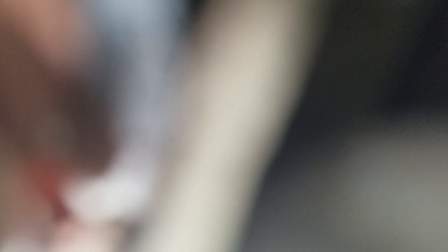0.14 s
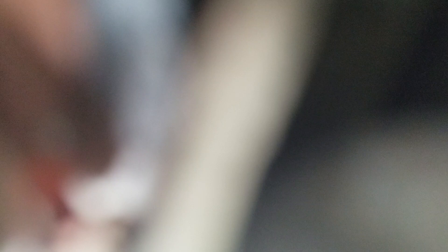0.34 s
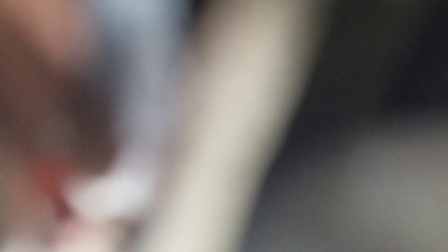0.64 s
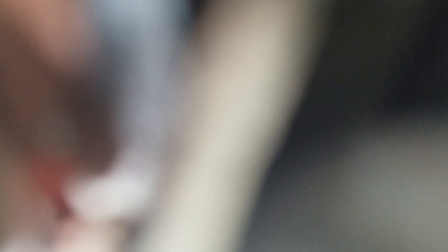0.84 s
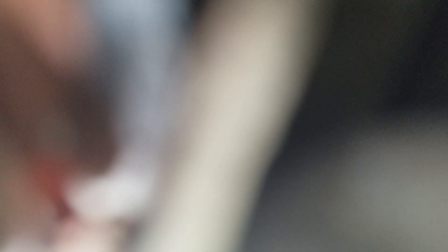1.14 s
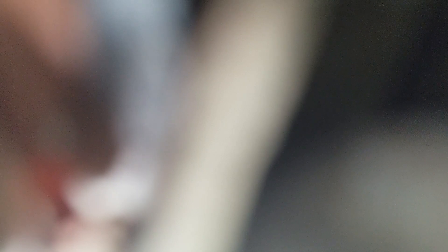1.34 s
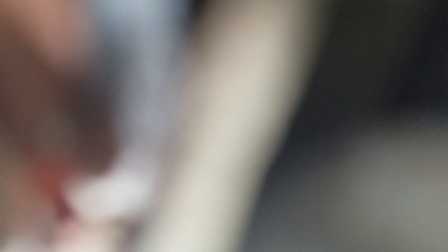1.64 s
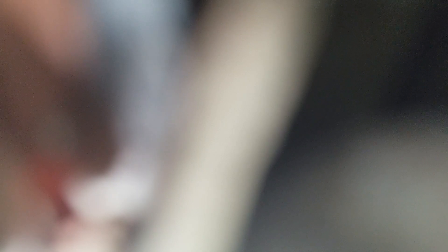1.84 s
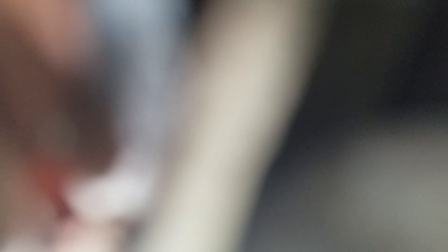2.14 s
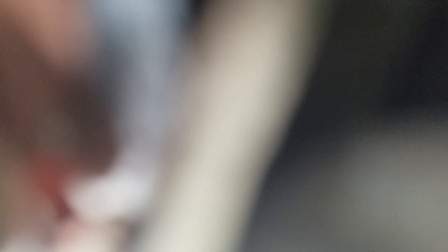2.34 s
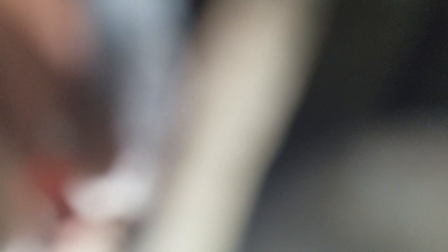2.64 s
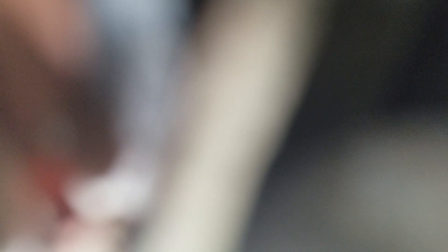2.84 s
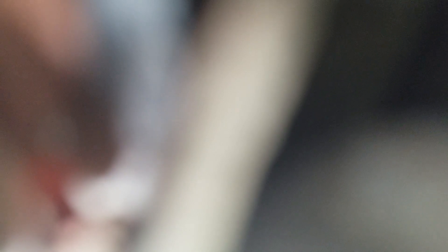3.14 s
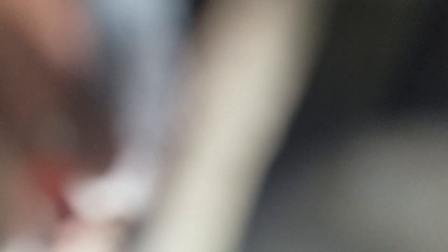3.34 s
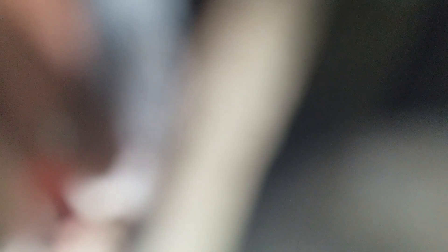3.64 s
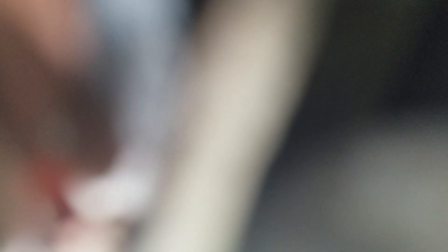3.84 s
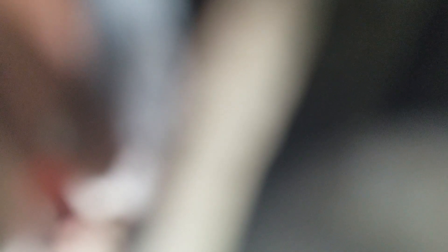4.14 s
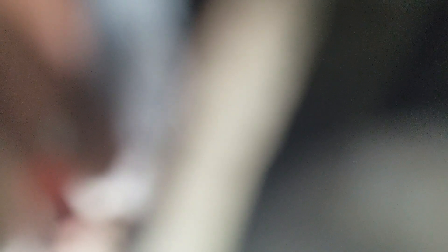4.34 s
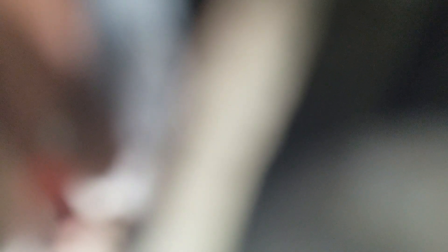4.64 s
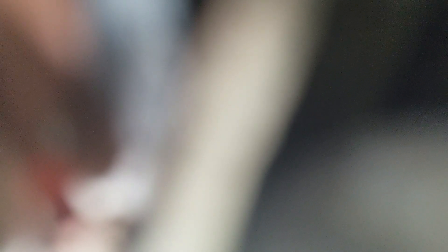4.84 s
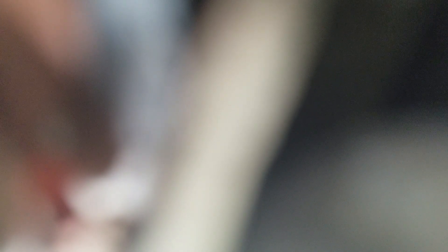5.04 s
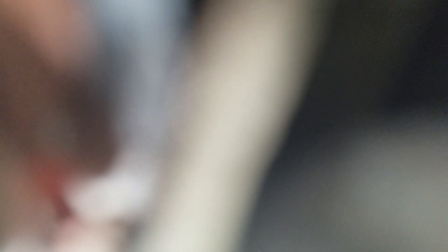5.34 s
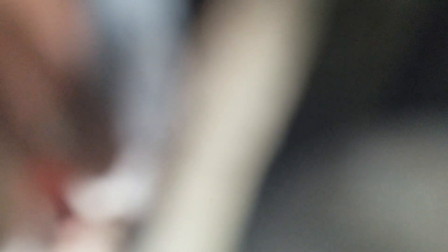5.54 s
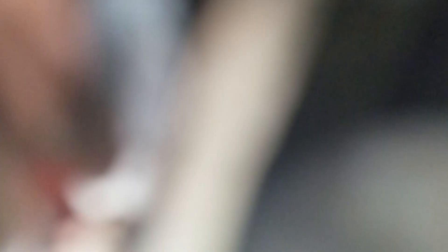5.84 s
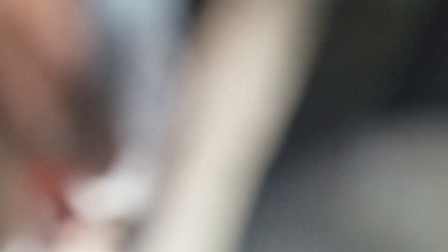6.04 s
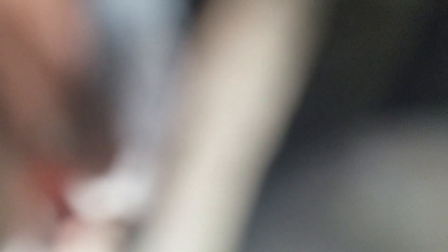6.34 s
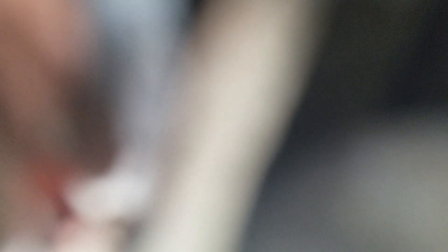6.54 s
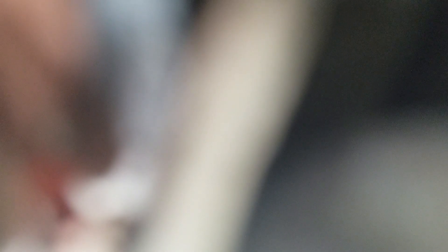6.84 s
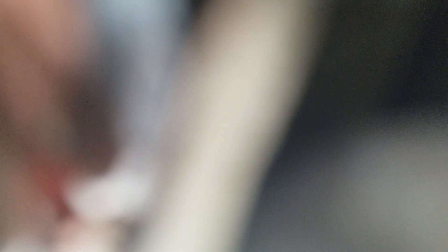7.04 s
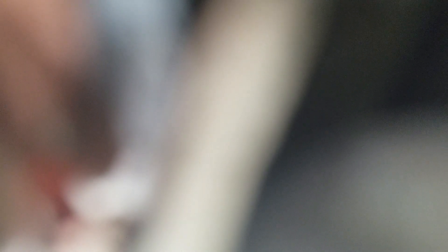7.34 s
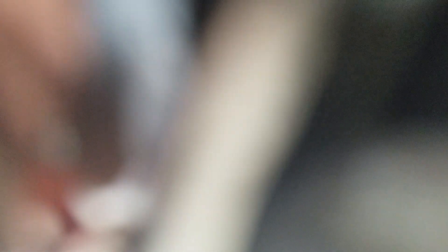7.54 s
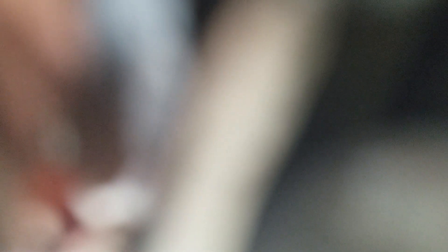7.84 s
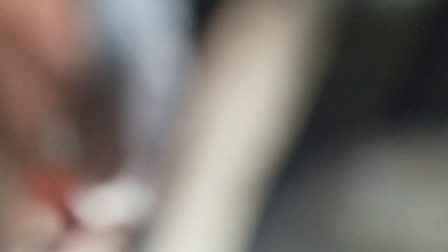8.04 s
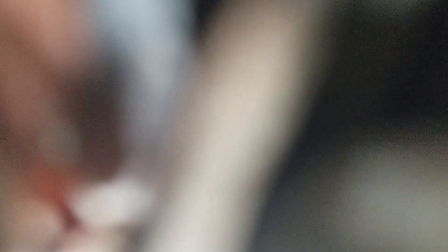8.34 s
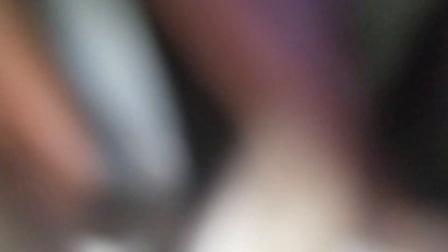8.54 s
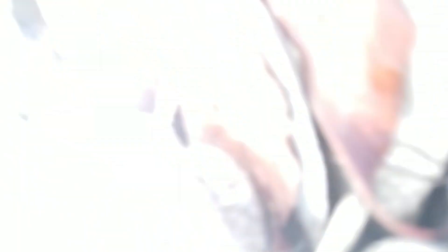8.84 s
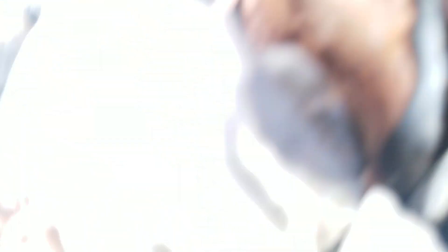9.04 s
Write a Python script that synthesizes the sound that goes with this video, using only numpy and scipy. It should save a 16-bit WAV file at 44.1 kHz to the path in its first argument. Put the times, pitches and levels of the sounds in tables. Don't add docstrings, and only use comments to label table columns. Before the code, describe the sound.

Very close stereo pickup, held in the hand, with low hum and thin hiss underneath. Small drips and crackles come first over soft finger rubbing, then quiet. A loud hollow gulp rings in a plastic bottle, followed by irregular wet plops of soap on water, skin scrapes and nail ticks. Near the end, bright knocks cluster with deep plops and a fine wash of water.

```python
import sys
import numpy as np
from scipy import signal
from scipy.fft import rfft, irfft, next_fast_len
from scipy.io import wavfile
from scipy.ndimage import uniform_filter1d

SR = 44100
rng = np.random.default_rng(int(sys.argv[2]) if len(sys.argv) > 2 else 0)


def boost_factor(decibels):
    exponent = np.asarray(decibels, float) / 20
    return 10 ** exponent


def inscribe(sig):
    pcm = np.round(np.clip(np.atleast_2d(sig).T, -1, 1) * 32767)
    wavfile.write(sys.argv[1], SR, pcm.astype(np.int16))


N = 405719

# (time [s], left lead [ms], left over right [dB])
BOTTLE_PLACE = [
    (0, 0.058, 3),
    (2.702, 0.36, 4),
    (3.6, 0.1, 4),
    (6.5, -0.15, 0.5),
    (6.62, -0.63, -5),
    (7.25, -0.23, 1),
    (7.349, 0.44, -4.5),
    (8.4, -0.13, 10),
    (8.44, -0.27, 21),
]
# (time [s], left over right [dB])
HAND_PLACE = [(0, 14.5), (.5, 11.5), (.6, 7), (2.5, 13), (2.91, 9), (3, -2), (3.26, -5), (3.4, 3), (5.5, 6),
              (5.9, -1.5), (7.6, -1), (7.72, 13), (8.3, 3), (8.36, 33), (8.55, 13.5), (8.72, 7),
              (8.88, 18.5), (9.1, 6.5)]
PORT_GAP = 20


def evened(x):
    return x / np.sqrt(np.mean(x ** 2) + 1e-20)


def wander(length, size):
    noise = rng.standard_normal(length)
    return evened(uniform_filter1d(uniform_filter1d(noise, size=size), size=size))


def read(points, hz):
    f, value = np.transpose(points)
    return np.interp(np.log(hz + 1), np.log(f + 1), value)


def add(mix, s, sound):
    part = mix[:, max(round(s * SR), 0):][:, :sound.shape[1]]
    part += sound[:, :part.shape[1]]


def sides(pan_db):
    pair = boost_factor(np.array([pan_db / 2, -pan_db / 2]))
    return pair / np.sqrt((pair ** 2).mean(0))


def glugs():
    out = np.zeros((2, N))
    when, leads, pans = np.transpose(BOTTLE_PLACE)
    tones = rings()
    snaps = uniform_filter1d(rng.standard_normal((len(tones), 2, 800)), size=5)
    shake = 0.039 * wander(N + SR, 300)
    flutter_db = 2.2 * wander(N + SR, 150)
    for (s, db, hz, t60, rise), snap in zip(tones, snaps):
        lead_ms, pan_db = np.interp(s, when, leads), np.interp(s, when, pans)
        delay = np.array([[-lead_ms], [lead_ms]]) / 2000
        t = np.maximum(np.arange(int(t60 * SR) + 800) / SR - delay - .0005, 0)
        drift = np.cumsum(shake[int(s * SR + hz):][:t.shape[1]]) / SR
        phase = 2 * np.pi * hz * (t + rise * t * t / 2 + drift)
        tone = np.sin(phase) + 0.046 * np.sin(2 * phase)
        tone = tone * boost_factor(-60 * (t / max(t60, .01)) ** 1.25)
        tone = tone * boost_factor(flutter_db[int(s * SR + 2 * hz):][:t.shape[1]])
        tone[:, :800] += 0.27 * snap * np.exp(-t[:, :800] / 0.0018)
        onset = 1 - np.exp(-t / 0.00053)
        add(out, s - .0005, boost_factor(db) * onset * tone * sides(pan_db)[:, None])
    out = signal.sosfilt(signal.butter(2, 110, 'high', fs=SR, output='sos'), out)
    t = np.arange(6000) / SR
    wall = rng.standard_normal((2, 6000)) * boost_factor(-60 * t / 0.13)
    blur = signal.oaconvolve(out, wall / np.linalg.norm(wall[0]), axes=1)[:, :N]
    return out + boost_factor(-12.5) * blur


def rings():
    # (time [s], peak level [dB], pitch [Hz])
    bubbles = [(0.585, -24.5, 1495), (0.63, -32, 1570), (0.728, -34.5, 1340), (1.682, -38, 1380),
               (1.717, -38, 1280), (1.794, -34.5, 1550), (2.632, -38, 600), (2.634, -2.5, 423),
               (2.653, -8.5, 319), (2.836, -11, 426), (3.599, -44.5, 524), (4.611, -27, 1180),
               (4.95, -28.5, 1000), (5.662, -27, 1950), (6.03, -40, 630), (6.447, -15.5, 422),
               (6.634, -22.5, 420), ]
    # (time [s], peak level [dB], pitch [Hz])
    plops = [(3.21, -27.5, 257), (4.261, -27.5, 344), (4.446, -18, 292), (5.103, -16, 614),
             (5.345, -15.5, 520), (6.257, -29, 167), (6.457, -7, 210), (6.795, -12.5, 382),
             (6.876, -12.5, 580), (7.013, -18.5, 430), (7.189, -19.5, 1410), (7.184, -18, 586),
             (7.359, -18.5, 590), (7.487, -12, 240), (7.506, -21, 195), (7.541, -14.5, 216),
             (7.757, -17.5, 1280), (8.512, -16.5, 330), (8.617, -20.5, 1340), (8.798, -15.5, 895),
             (8.881, -7.5, 1070), (8.878, -5.5, 400), (8.908, -7, 378), (9.19, -17.5, 454)]
    # (time [s], peak level [dB], pitch [Hz])
    sips = [(1.309, -54, 890), (1.308, -44, 1254), (4.278, -40.5, 470), (4.279, -44, 716), (4.39, -46, 644),
            (4.455, -21, 567), (4.558, -47, 610), (4.833, -38, 694), (5.965, -41, 625), (6.226, -44.5, 883),
            (7.208, -35, 580), (7.717, -43, 253), (8.731, -29, 616), (8.767, -30.5, 364)]
    # (time [s], peak level [dB], pitch [Hz], time to fall 60 dB [s])
    belly = [(2.331, -35, 297, 0.19), (2.642, -13, 289, 0.14), (2.838, -15, 288, 0.083),
             (2.848, -14, 307, 0.056), (2.871, -20.5, 306, 0.083), (2.906, -20, 340, 0.037),
             (2.93, -30, 287, 0.19), (4.598, -19.5, 286.7, 0.18), (4.662, -36, 310, 0.11),
             (4.699, -32, 233, 0.14), (4.977, -20, 267, 0.062), (5.107, -20.5, 267, 0.11),
             (5.45, -19, 256.5, 0.12), (5.527, -21.5, 338, 0.077), (5.54, -25, 274, 0.092),
             (5.55, -21.5, 201, 0.11), (5.786, -38, 244, 0.098), (7.392, -30.5, 228, 0.062),
             (7.889, -35, 254, 0.08), (8.061, -34.5, 262, 0.087), (8.225, -34, 264, 0.099),
             (8.387, -30.5, 264, 0.15), (8.793, -28, 215, 0.17), (8.926, -15.5, 162, 0.027),
             (9.003, -24.5, 145, 0.026)]
    # (time [s], peak level [dB], pitch [Hz], time to fall 60 dB [s])
    neck = [(.011, -33.5, 394, 0.078), (0.504, -20, 510, 0.089), (0.665, -33.5, 559, 0.07),
            (0.667, -34, 717, 0.064), (0.788, -34, 534, 0.057), (0.915, -34, 505, 0.073),
            (2.605, -14.5, 485, 0.09), (2.634, -12, 361, 0.18), (2.636, -8.5, 1024, 0.077),
            (2.659, -6.5, 480, 0.095), (2.634, -11, 448, 0.13), (2.647, -10, 474.8, 0.14),
            (4.05, -33.5, 470, 0.13), (4.705, -25.5, 334, 0.062), (4.713, -24, 413, 0.083),
            (4.833, -39, 400, 0.11), (4.888, -20.5, 813, 0.1), (5.075, -37.5, 444, 0.19),
            (5.103, -19.5, 400, 0.088), (5.17, -28.5, 394, 0.092), (5.36, -36, 515.3, 0.47),
            (5.843, -34.5, 540, 0.12), (5.965, -41.5, 407, 0.21), (5.986, -38.5, 525, 0.18),
            (6.227, -41.5, 550, 0.14), (6.392, -26, 444, 0.17), (6.452, -17, 367, 0.12),
            (6.894, -27.5, 461, 0.084), (7.039, -31.5, 448, 0.18), (8.45, -22, 488, 0.084)]
    # (time [s], peak level [dB], pitch [Hz], time to fall 60 dB [s], pitch rise [share per s])
    chirps = [(.52, -38, 1290, 0.023, 18), (6.04, -47, 780, 0.17, 10.5), (.561, -36, 1670, 0.017, 1),
              (.582, -18, 1167, 0.026, 42), (.611, -35.5, 1830, 0.038, 8), (.621, -35, 2440, .015, 14),
              (.659, -35.5, 260, .07, 0.5), (6.65, -30, 630, 0.037, 1), (6.544, -29.5, 435, 0.05, 7),
              (0.804, -37, 1550, 0.01, 3), (3.04, -34.5, 116, 0.28, -5.5), (.917, -47, 1670, .02, 3),
              (.011, -30.5, 636, 0.027, 15), (2.766, -35.5, 520, 0.11, -3), (2.848, -35.5, 96.4, 0.59, 0),
              (2.914, -32, 674, 0.027, -5), (4.873, -22, 568, 0.076, 31), (4.888, -33, 897, 0.13, 4.5),
              (4.965, -34, 945, 0.046, -34), (4.988, -44, 843, .1, 2.5), (5.208, -33, 468, 0.062, 7),
              (5.348, -28, 1140, 0.021, 34), (5.408, -28, 633, 0.037, 2), (5.545, -36, 520, 0.05, 18),
              (5.56, -32.5, 454, .1, 0), (5.99, -34.5, 449, 0.11, 12.5), (6.393, -46, 1430, .03, 12),
              (6.96, -29.5, 468, 0.023, 6), (7.108, -29.5, 520, .05, 5)]
    tones = list(chirps)
    for rows, cycles, rise_per_s in [(bubbles, 20.5, 19), (plops, 2.8, 13), (sips, 42.6, 0.35)]:
        tones += [(s, db, hz, cycles / hz, rise_per_s) for s, db, hz in rows]
    tones += [(*row, 0.97) for row in belly]
    tones += [(*row, 0.98) for row in neck]
    return tones


def rough_bursts():
    # (time [s], hold [s], level [dB], top frequency [Hz])
    surges = [(2.585, 0.015, -32.5, 2230), (2.599, 0.014, -20, 2200), (2.629, 0.026, -17.5, 1670),
              (2.763, .01, -48.5, 2290), (2.829, 0.0042, -33, 2700), (2.89, 0.0064, -42, 2510),
              (7.488, 0.05, -22, 3490), (4.599, 0.0076, -36.5, 2640), (5.102, 0.0084, -43, 1870),
              (6.385, 0.0097, -42, 2600), (6.445, 0.013, -28, 1280), (6.537, 0.01, -51, 2980),
              (8.442, 0.029, -25.5, 1500), (8.366, 0.009, -29.5, 2160)]
    low_hz, fall_db_per_s = 520, 551
    out, t = np.zeros((2, N)), np.arange(6000) / SR
    when, _, pans = np.transpose(BOTTLE_PLACE)
    noises = rng.standard_normal((len(surges), 4, 6000))
    for (s, hold, db, top_hz), (a, b, c, lumps) in zip(surges, noises):
        lumps = boost_factor(4.7 * evened(uniform_filter1d(lumps, size=120)))
        band = signal.butter(2, [low_hz, top_hz], 'band', fs=SR, output='sos')
        body = evened(signal.sosfilt(band, np.array([a + 1.3 * c, b - 1.1 * c]) * lumps))
        shape = np.minimum(t / 0.0043, 1) * boost_factor(db - fall_db_per_s * np.maximum(t - hold, 0))
        add(out, s, body * shape * sides(np.interp(s, when, pans))[:, None])
    return out


def ticks():
    # (time [s], peak level [dB], ring
    # [Hz])
    light_ticks = [(0.067, -45.5, 4150), (0.237, -29, 3120), (0.3683, -38, 3880), (0.406, -38.5, 3120),
                   (0.504, -36, 3000), (0.5354, -33, 5300), (0.5874, -47, 1900), (0.668, -44, 3820),
                   (0.896, -44.5, 3200), (1.481, -46, 5200), (1.5041, -39, 5340), (1.554, -28.5, 4860),
                   (1.579, -49, 4070), (1.6316, -33, 3120), (1.66, -45, 6750), (1.716, -45.5, 2850),
                   (1.7884, -53, 7500), (1.839, -47.5, 3140), (2.274, -45.5, 3850), (5.898, -40, 2070),
                   (8.542, -26, 4530), (8.637, -20.5, 6840), (8.88, -19.5, 2740), (8.91, -24, 2920),
                   (9.191, -35, 1860)]
    # (time [s], peak level [dB], ring [Hz])
    nails = [(2.4981, -33, 3640), (2.5852, -32, 2320), (2.6054, -20, 2110), (2.8334, -32, 2370),
             (3.2154, -22.5, 3530), (3.2603, -36, 2210), (3.951, -30.5, 3620), (4.601, -25.5, 2980),
             (5.244, -41, 11000), (5.291, -26, 1960), (5.3467, -19, 11200), (5.41, -25, 10000),
             (5.45, -26.5, 2740), (6.2264, -40.5, 3980), (6.38, -28.5, 3740), (6.64, -18.5, 3260),
             (6.799, -14.5, 4740), (6.804, -20, 2760), (7.1838, -26.5, 3520), (7.491, -32, 2950),
             (7.497, -18, 1500), (7.519, -23, 1530), (7.529, -15.5, 1680), (7.7594, -28.5, 2330),
             (7.943, -33.5, 2400), (8.3324, -35, 4660), (8.424, -25, 6900), (8.53, -32, 3130)]
    # (time [s], peak level [dB], ring [Hz])
    taps = [(0.0527, -30, 3900), (0.199, -27, 3640), (0.297, -28, 4410), (0.311, -24, 4120),
            (0.429, -28, 7310), (0.469, -25, 3610), (0.6833, -27, 1750), (1.285, -32, 7260),
            (1.455, -40, 3660), (1.536, -32, 3000), (1.5924, -30, 6290), (1.572, -39, 2020),
            (2.92, -28, 4160), (3.0799, -35, 2420), (3.189, -29, 3670), (4.456, -30, 1940),
            (4.5153, -32, 1960), (4.6234, -38, 1500), (4.769, -35, 2340), (4.8198, -32.5, 4110),
            (4.974, -21.5, 3700), (5.082, -26.5, 3860), (5.125, -21, 3270), (5.599, -28, 3640),
            (5.9887, -24.5, 5700), (6.3664, -37, 3700), (6.4574, -35, 1560), (6.5172, -26, 2260),
            (6.684, -27, 2150), (6.7127, -30, 2160), (6.767, -30, 2180), (6.861, -17, 1990),
            (7.042, -24, 5030), (7.112, -25.5, 2420), (7.249, -36, 3800), (7.921, -35, 1840),
            (8.1195, -27.5, 2170), (8.208, -32.5, 2450), (8.336, -15, 4600), (8.379, -26, 4640),
            (8.5096, -28, 3110), (8.619, -15, 7200), (8.6847, -32, 3380), (8.7924, -19, 2520),
            (8.8204, -35, 2090), (8.837, -18.5, 2910), (8.983, -25, 5870), (9.0059, -32, 3890),
            (9.081, -29, 3990)]
    rows = [(*row, .15) for row in light_ticks] + [(*row, .35) for row in nails]
    rows += [(s, db - 14.5, hz, .2) for s, db, hz in taps]
    out, t = np.zeros((2, N)), np.arange(900) / SR
    for (s, db, hz, share), snap in zip(rows, rng.standard_normal((len(rows), 2, 900))):
        pan_db = np.interp(s, *np.transpose(HAND_PLACE))
        ring = np.sin(2 * np.pi * hz * t) * np.exp(-t * hz / 1.52) * (1 - np.exp(-t * hz / 0.3))
        scatter = (t == 0) + 0.32 * snap[0] * np.exp(-t / 0.0017)
        ring = signal.fftconvolve(ring, scatter)[:len(t)]
        pair = np.array([ring, ring])
        pair[int(pan_db > 0)] = np.roll(ring, PORT_GAP)
        fade = np.exp(-t / 0.0011) + 0.061 * np.exp(-t / .006)
        snap = np.diff(uniform_filter1d(snap, size=3), prepend=0) * fade
        add(out, s - .0006, boost_factor(db + 10.5) * (pair + share * snap) * sides(pan_db)[:, None])
    return signal.sosfilt(signal.butter(2, 1000, 'high', fs=SR, output='sos'), out)


def rub():
    hiss_db, scrape_db, thump_db, pan_db = touch()
    near_left = np.clip(.5 + pan_db / 4, 0, 1)
    wide = 0.4 + grip(55, 2.4, 0.003)
    wide = wide * boost_factor(2.1 * wander(N, 600))
    air = skin(wide + grip(120, 1.7, 0.00072), 13960, 30000, 0.51, near_left)
    hiss = skin(wide + grip(83, 0.91, 0.00083), 2600, 7000, 0.087, near_left)
    scrape = skin(wide + grip(46, 6.8, 0.0098), 760, 3900, 0.87, near_left)
    thump = skin(wide + grip(36, 3.5, 0.008), 55, 570, 1.1, near_left)
    air = boost_factor(hiss_db - 2.0 - 0.46 * pan_db) * air
    hiss = boost_factor(hiss_db - 5.5) * hiss
    froth_gain = boost_factor(np.minimum(scrape_db, -39) - 6.5)
    scrape = boost_factor(scrape_db - 0.4) * scrape + froth_gain * both_ports(froth(), near_left)
    thump = boost_factor(thump_db - 0.03) * thump
    treble = air * sides(pan_db - 9.0) + hiss * sides(pan_db + 2.0)
    return treble + scrape * sides(pan_db) + thump * sides(0.62 * pan_db)


def touch():
    # (start [s], hold [s], strength [dB], weight [dB])
    grabs = [(0.502, 0.0023, -49, 11), (2.592, 0.072, -31.5, -2), (2.833, 0.003, -51, 18.5),
             (2.906, 0.019, -56.5, 12.5), (3.19, 0.06, -36.5, -1.5), (4.603, 0.0022, -47, 10.5),
             (4.962, 0.0068, -40.5, -3.5), (5.09, 0.073, -43, -5.5), (6.388, 0.0074, -36.5, 2.5),
             (6.434, 0.017, -43, 1), (6.796, 0.075, -28, -6.5), (7.492, 0.031, -28.5, 5.),
             (7.703, 0.0094, -53.5, 11), (7.915, 0.0054, -40, 2.5), (8.337, 0.055, -25.5, -20.5),
             (8.44, 0.031, -20.5, -9), (8.529, 0.0042, -21, -11), (8.798, 0.018, -39.5, 12.5)]
    # (middle [s], half length [s], strength [dB], weight [dB])
    slides = [(0.239, 0.35, -36.5, -10), (0.698, 0.49, -50.5, -4.5), (1.585, 0.17, -45, -32),
              (2.339, 0.12, -44, -8.5), (2.553, 0.46, -45.5, -9.5), (3.046, 0.27, -45, -1.5),
              (3.35, 0.57, -45, -7), (4.007, 0.21, -43.5, -9.5), (4.453, 0.54, -47, -8.5),
              (4.97, 0.98, -58.5, 4), (5.322, 0.14, -29, -11), (5.433, 0.25, -37, -2.5),
              (5.9, 0.24, -43.5, -5), (6.524, 0.3, -39.5, -2.5), (6.667, 0.14, -30.5, -8),
              (7.063, 0.16, -36.5, -2), (7.367, 1, -53.5, 2), (8.121, 0.023, -44.5, 1),
              (8.643, 0.57, -38, -6), (9.03, 1, -41.5, -5)]
    # (start [s], length [s])
    lifts = [
        (3.134, 0.067),
        (6.296, 0.089),
        (7.772, 0.16),
        (8.397, 0.021),
    ]
    grab_db_per_s, let_go_db_per_s = 1896, 349
    slide_depth_db, lift_db = 20, -8.5
    t = np.arange(0, N / SR, 1 / 500)
    levels, weights = [-66 + 0 * t], [-44]
    for s, hold, db, weight_db in grabs:
        before, after = np.maximum(s - t, 0), np.maximum(t - s - hold, 0)
        levels.append(db - grab_db_per_s * before - let_go_db_per_s * after)
        weights.append(weight_db)
    for s, half, db, weight_db in slides:
        levels.append(db - slide_depth_db * (abs(t - s) / half) ** 0.88)
        weights.append(weight_db)
    level_db, weight_db = np.array(levels), np.array(weights)[:, None]
    level_db = level_db + lift_db * sum((t > s) & (t < s + length) for s, length in lifts)
    layers = level_db, level_db + weight_db, level_db + weight_db + 1.5
    fine = np.arange(N) / SR
    curves = [np.interp(fine, t, 10 * np.log10((boost_factor(v) ** 2).sum(0))) for v in layers]
    return curves + [np.interp(fine, *np.transpose(HAND_PLACE))]


def grip(per_s, spread_db, slip_s):
    slips = boost_factor(spread_db * np.minimum(rng.exponential(1, N), 2)) * (rng.random(N) < per_s / SR)
    return signal.lfilter([1], [1, -np.exp(-1 / (SR * slip_s))], slips)


def skin(pressure, lo_hz, hi_hz, through, near_left):
    # (frequency [Hz], level [dB per Hz])
    casing = [(40, -13), (140, -6), (450, -8), (1000, -1), (2100, -7.5), (2900, -9.5), (3900, -10),
              (5800, -11), (7000, -10.5), (8700, -14.5), (11000, -14.5), (16000, -22)]
    left, right, common = rng.standard_normal((3, N)) * pressure
    size = next_fast_len(N)
    hz = np.fft.rfftfreq(size, 1 / SR) + 1
    shape = boost_factor(read(casing, hz)) / np.sqrt((1 + (lo_hz / hz) ** 6) * (1 + (hz / hi_hz) ** 6))
    mix = np.array([left, right]) + through * both_ports(common, near_left)
    return evened(irfft(rfft(mix, size) * shape, size)[:, :N])


def both_ports(common, near_left):
    late = np.roll(common, PORT_GAP)
    return np.array([near_left * common + (1 - near_left) * late, near_left * late + (1 - near_left) * common])


def froth():
    out, t = np.zeros(N), np.arange(1500) / SR
    which = rng.integers(0, 16, N)
    bursts = rng.random(N) < 130 / SR
    size = boost_factor(3 * np.minimum(rng.exponential(1, N), 3)) * bursts
    for k, hz in enumerate(np.geomspace(300, 1500, num=16)):
        tone = np.sin(2 * np.pi * hz * (t + 7 * t * t)) * np.exp(-t * hz / 9) * (1 - np.exp(-t / 0.00022))
        out += signal.oaconvolve(size * (which == k), tone)[:N]
    return evened(out)


def crackles():
    # (time [s], peak level [dB])
    pops = [(0.065, -28), (0.24, -17), (0.367, -23.5), (0.405, -31), (0.4284, -30), (0.5043, -22),
            (0.5346, -26), (0.583, -29), (1.256, -36), (1.554, -20.5), (1.6611, -33), (1.7904, -34),
            (2.6675, -26.5), (3.008, -35.5), (3.081, -33.5), (3.189, -28.5), (3.2081, -35), (3.261, -16.5),
            (3.292, -30.5), (3.935, -21), (4.126, -40), (4.4386, -30.5), (4.6258, -24), (4.821, -30),
            (4.9741, -32), (5.0998, -32), (5.221, -20), (5.243, -17.5), (5.272, -14), (5.317, -21),
            (5.346, -32), (5.4086, -25), (5.4509, -12), (5.8137, -39), (5.9239, -16), (6.1907, -31.5),
            (6.2246, -23.5), (6.388, -30.5), (6.4588, -17.5), (6.6243, -25), (6.6388, -26), (6.802, -14.5),
            (7.0145, -35), (7.0364, -29), (7.1606, -55), (7.1864, -23), (7.4949, -23), (7.523, -18),
            (7.6164, -23), (8.11, -32), (8.209, -27), (8.3335, -36), (8.3409, -16), (8.423, -25),
            (8.5305, -27), (8.542, -8), (8.6328, -16), (9.141, -22)]
    out, t = np.zeros((2, N)), np.arange(500) / SR
    for (s, db), snap in zip(pops, rng.standard_normal((len(pops), 2, 500))):
        pan_db = .4 * np.interp(s, *np.transpose(HAND_PLACE)) - 4
        add(out, s - .0003, boost_factor(db - 3.0) * snap * np.exp(-t / 0.001) * sides(pan_db)[:, None])
    return signal.sosfilt(signal.butter(3, 7500, 'high', fs=SR, output='sos'), out)


def slosh():
    start_s, rise_s, ebb_s, level_db = 8.64, 0.24, 8.95, -47.5
    t = np.arange(N) / SR
    band = signal.butter(3, [1000, 5200], 'band', fs=SR, output='sos')
    wash = evened(signal.sosfilt(band, rng.standard_normal((2, N))))
    swell = np.clip((t - start_s) / rise_s, 0, 1) * boost_factor(-30 * np.maximum(t - ebb_s, 0))
    return boost_factor(level_db) * swell * wash * sides(14.0)[:, None]


def room():
    # (frequency [Hz], level [dB per Hz])
    colour = [(25, -48), (59, 5.5), (149, -7.5), (195, -13.5), (277, -15), (600, -33), (1400, -34),
              (3100, -72), (3800, -26.5), (6800, -30.5), (7550, -18.5), (8300, -39), (9000, -44.5),
              (16000, -49.5)]
    # (frequency [Hz], likeness [0 to 1])
    likeness = [(60, 0.99), (240, 0.94), (950, 0.62), (3770, 0.0017), (15000, 0.032)]
    # (frequency [Hz], left over right [dB])
    balance = [(60, 0.5), (180, 3), (550, 1), (1650, -2.5), (4970, 19.5), (15000, -8.5)]
    frames, hz = N // 512 + 5, np.fft.rfftfreq(2048, 1 / SR)
    a, b, c, d, patches = rng.standard_normal((frames, 1025, 5)).T
    patches = evened(uniform_filter1d(uniform_filter1d(patches, size=20, axis=0), size=8, axis=1))
    same = np.clip(read(likeness, hz), -1, 1)[:, None]
    left, other = a + 1j * b, c + 1j * d
    z = np.array([left, same * left + np.sqrt(1 - same ** 2) * other])
    z *= boost_factor(read(colour, hz)[:, None] + 0.43 * patches) * sides(read(balance, hz))[:, :, None]
    return boost_factor(-53.5) * evened(signal.istft(z, nperseg=2048, noverlap=1536)[1][:, :N])


def ducking(near):
    power_db = 10 * np.log10(abs(uniform_filter1d((near ** 2).mean(0), size=2000)) + 1e-12)
    fall = np.arange(N) * 7.1 / SR
    held_db = np.maximum.accumulate(power_db + fall) - fall
    over_db = np.maximum(held_db + 22.5, 0)
    return boost_factor(-.7 * uniform_filter1d(over_db, size=400))


def scene():
    far = room()
    near = glugs() + rough_bursts() + ticks() + rub() + crackles() + slosh()
    return near + ducking(near) * far


def roll_off(x):
    return signal.sosfilt(signal.butter(12, 16990, fs=SR, output="sos"), x)


def record(dry):
    held = .98 * np.tanh(dry / .98)
    low_pass = signal.firwin(255, 15900, window=("kaiser", 5), fs=SR)
    cut = signal.oaconvolve(held, low_pass[None], "same")
    return roll_off(cut)


dry = scene()
out = record(dry)
inscribe(out)
```